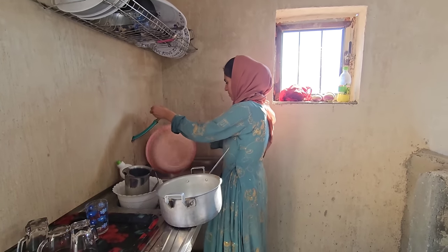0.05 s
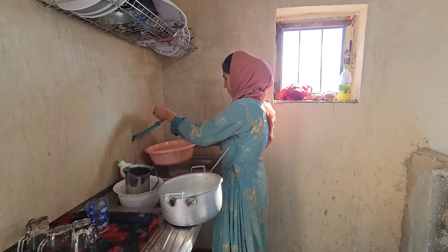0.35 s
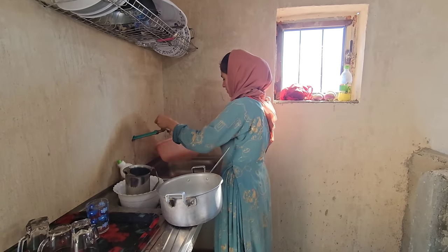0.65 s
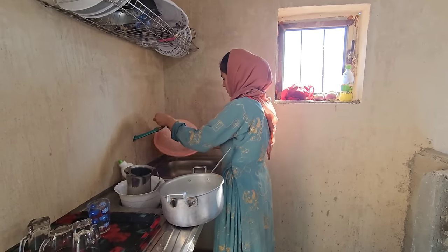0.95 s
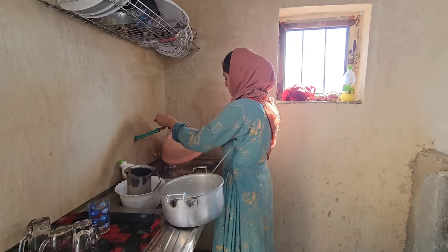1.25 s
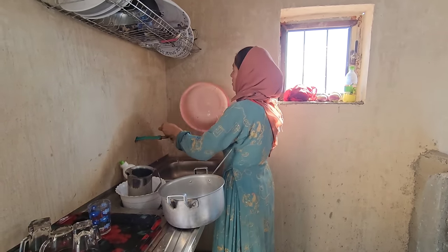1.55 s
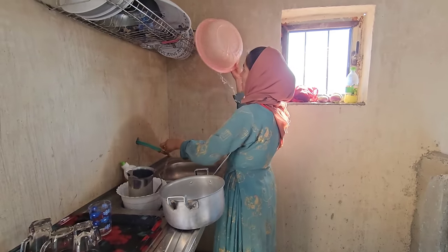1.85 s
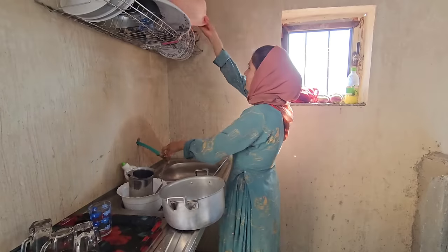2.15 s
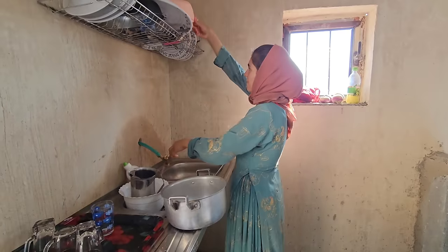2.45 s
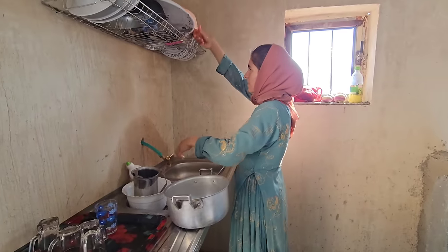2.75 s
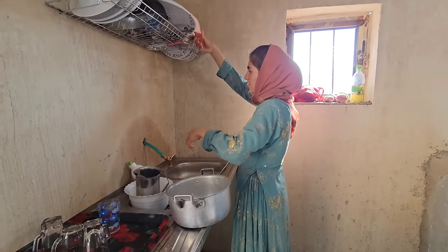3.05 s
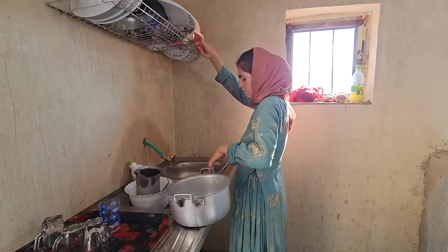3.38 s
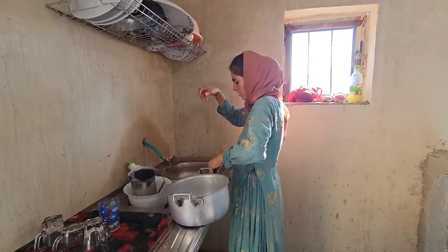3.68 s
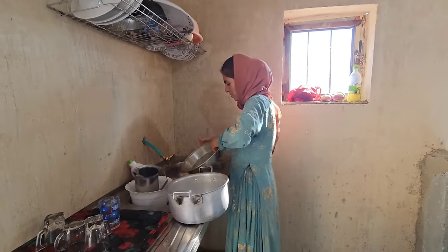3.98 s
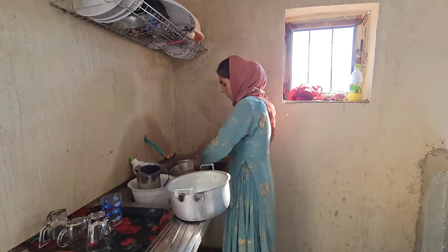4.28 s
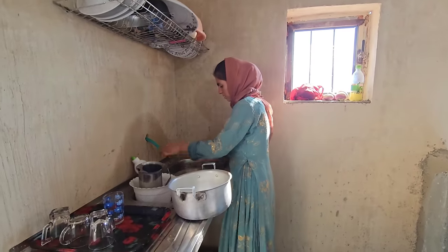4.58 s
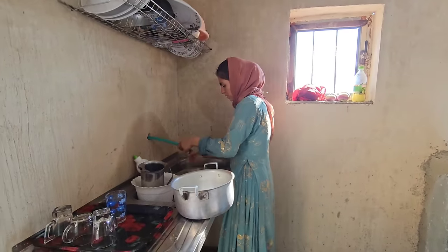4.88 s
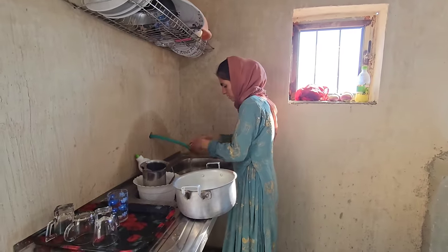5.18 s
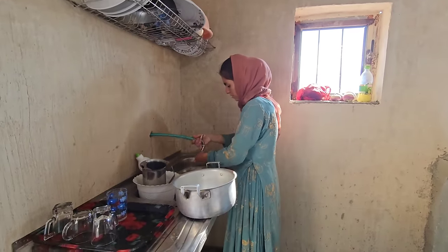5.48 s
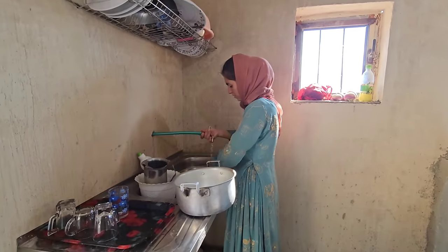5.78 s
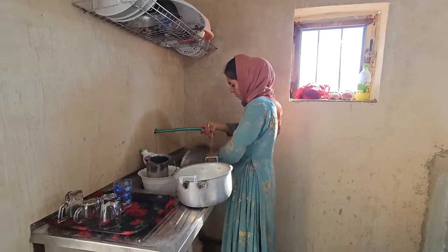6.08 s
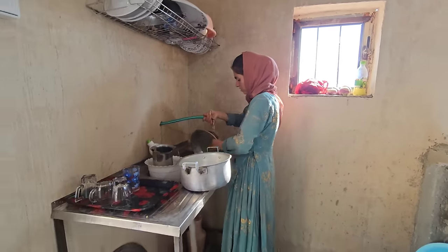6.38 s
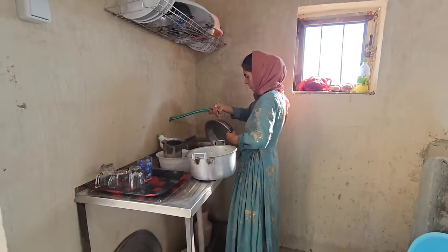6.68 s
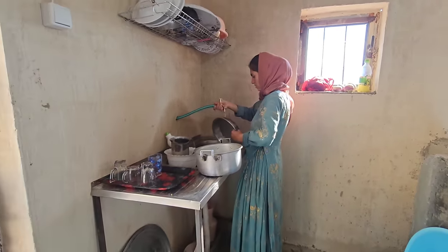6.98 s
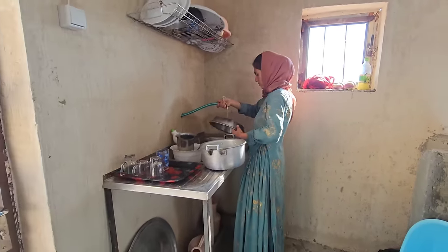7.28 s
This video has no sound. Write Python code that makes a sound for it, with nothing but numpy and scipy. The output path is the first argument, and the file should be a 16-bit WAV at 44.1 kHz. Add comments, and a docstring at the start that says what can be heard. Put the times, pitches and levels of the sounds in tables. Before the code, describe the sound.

Dishes being rinsed in a small room: trickling, splashing water, a bowl knocking on a metal sink and a lid clanging down.

```python
"""Water from a thin hose splashes over a plastic bowl and drums on a steel sink in a small, bare kitchen.
The bowl knocks on the sink and is pushed into a wire rack; a metal lid is lifted, dropped and rinsed.
Each knock makes a thing clatter and ring; the water is made of drops, bubbles and noise.
A finger covers the left microphone, so that side has only muffled thuds and the rumble of the hand."""
import sys
import numpy as np
from scipy import signal
from scipy.fft import rfft, irfft
from scipy.io import wavfile
from scipy.ndimage import uniform_filter1d, minimum_filter1d

SR = 44100
rng = np.random.default_rng(int(sys.argv[2]) if len(sys.argv) > 2 else 0)


def generate_wav(signal):
    """Clip the signal to [-1, 1] and save it as 16-bit WAV at the path in sys.argv[1]."""
    frames = np.transpose(np.atleast_2d(signal))
    scaled = np.clip(frames, -1, 1) * 32767
    pcm = np.round(scaled).astype(np.int16)
    wavfile.write(sys.argv[1], SR, pcm)


N = 332514
TIME = np.arange(N) / SR

# Levels are relative. A "fade" is the time a sound takes to drop by 60 dB.
# Knocks: t/s, level/dB, extra bass/dB, extra treble/dB, ring over clatter/dB, rattle time/s
SINK_KNOCKS = [(3.461, -40, -4, -10.5, -1, 0.03), (4.023, -16.5, 7, 1.5, 1, 0.0028),
               (4.286, -35, 3, 8.5, 2, .012), (4.308, -16, -4, -1.5, 1.5, 0.0024),
               (5.848, -41.5, 31, 19, -37, 0.011), (5.943, -36.5, 22.5, 5.5, 0.5, 0.012),
               (5.995, -38, 15, 1, -14, 0.0096), (6.123, -26.5, 19, 4.5, -1.5, 0.0022)]  # on the steel sink
RIM_KNOCKS = [(4.025, -19, -3, -33, 10, 0.0035), (6.501, -27, -3, 10, -16, 0.00042),
              (6.507, -25.5, 0, -9, 3, 0.005), (6.710, -31.5, -0.5, 1, -10, 0.0018)]  # the lid's rim on the sink
BOWL_KNOCKS = [(.976, -37, -11, 3, -12, 0.016), (1.052, -18.5, 8, 11.5, 1, 0.0029),
               (1.087, -19, 1.5, -4.5, 3.5, 0.0057), (1.124, -28, 5, 9, 4, 0.0087)]  # the bowl on the sink
RACK_KNOCKS = [(2.189, -33, 8, 5.5, -32, 0.02), (2.210, -36.5, 15, 0, -24, 0.0053),
               (2.224, -30, 12, 2, -4.5, 0.0073), (2.250, -34, 8.5, 1, -16, 0.0083),
               (2.272, -36, 3, 9, -29, 0.0026), (2.298, -35, -11, 4.5, -26, 0.0065),
               (2.326, -42, -6, 11, -17, 0.0022), (2.47, -45, 3, -15, -7, 0.088),
               (2.563, -36, 3.5, -4, -26, 0.018), (2.670, -43.5, -2, -7, -13, 0.019),
               (2.720, -36, 7, 10, 2, 0.0019), (2.756, -30.5, -2, 5, 3.5, 0.0012),
               (2.940, -49, 15, 11, -2.5, 0.0043), (3.066, -40.5, 1.5, -6, -6.5, 0.0051)]  # the bowl settling in the rack
LID_KNOCKS = [(3.596, -26, 2.5, 8.5, -3, 0.0013), (3.828, -47.5, -4, -20, -28, 0.005),
              (4.026, -24.5, 15, -19, 3, 0.0036)]  # the lid lifted and dropped
# The tone of each thing's short clatter: f/Hz, level/dB
SINK_CLATTER = [(50, -27.5), (82, -7), (100, -21.5), (132, 0), (175, -10.5), (245, -4), (320, -14.5),
                (470, -9.5), (580, -23), (1150, -20), (1800, -24.5), (2900, -27), (4200, -33.5),
                (7000, -38.5), (8600, -46.5), (11600, -39), (16000, -57)]
RIM_CLATTER = [(50, -52), (90, -4.5), (135, 0), (178, -22.5), (245, 0), (330, -11.5), (400, -10),
               (540, -17), (800, -7), (950, -19.5), (1400, -17.5), (2200, -26), (4000, -37.5), (6800, -40),
               (8600, -54), (11600, -46), (16000, -72)]
BOWL_CLATTER = [(45, -29), (75, -3), (98, -9), (128, 2.5), (190, -10), (245, -5.5), (300, -6.5), (372, -7),
                (470, -8.5), (1200, -15), (2100, -17), (2700, -22.5), (4400, -26.5), (7200, -34),
                (8600, -40.5), (11600, -37), (16000, -54)]
RACK_CLATTER = [(60, -29), (135, -6.5), (240, -22.5), (302, -4), (406, -19), (480, -6), (850, -8.5),
                (1100, -9), (1500, -8), (2200, -13.5), (4200, -15), (5200, -20), (7300, -21.5),
                (8500, -27.5), (11800, -18.5), (14000, -27.5), (16000, -34)]
LID_CLATTER = [(59, -29), (100, -6), (283, -12), (481, -0.5), (570, -12), (818, -7.5), (872, -12),
               (1550, -14.5), (2080, -22), (2520, -17), (2930, -20.5), (6990, -31), (16000, -49)]
# The notes that ring on after a knock: f/Hz, level/dB, fade/s
SINK_NOTES = [(121.1, 4, 0.46), (140, -3, 0.29), (178.2, -15, 0.81), (241.8, 6, 0.71), (275, 3.5, 0.43),
              (332, 1.5, 0.54), (347, -11, 0.15), (417, -2.5, 0.65), (498, -14, 0.19), (561, -10, 0.64),
              (807, -5, 0.43), (927, -20, 0.95), (1138, -2.5, 0.14), (1130, -16, 0.89), (1205, -12.5, 0.58),
              (1297, -8.5, 0.2), (1592, -11.5, 0.69), (2074, -16, 0.64), (2530, -11, 0.27),
              (2850, -33, 0.23)]
RIM_NOTES = [(126, -24, 0.25), (261, 5.5, 0.27), (371.5, -2.5, 0.67), (381.3, 3.5, 0.21), (626, -32, 0.22),
             (653, -16, 0.98), (803, 1.5, 0.31), (843, -5, 0.43), (1102, -8.5, 0.44), (1424, -1.5, 0.21),
             (1583, -14, 0.18), (1926, 1, 0.13), (3290, -9, 0.2)]
BOWL_NOTES = [(82.8, -7.5, 0.95), (124.8, 6.5, 0.24), (144, -13, 1), (247.2, 0.5, 0.43), (359, -10, 0.35),
              (382, -3, 0.48), (674, -7.5, 0.28), (1231, -5.5, 0.28), (1430, -10, 0.3), (1520, -7.5, 0.18),
              (2120, -19, .3)]
RACK_NOTES = [(523, 1, 0.38), (619.6, 9.5, 0.32), (834, 12, 0.27), (1023, 4, 0.36), (1240, 2, 0.48),
              (1560, 0, 0.6), (1694, -5, 0.19), (1640, 4.5, 0.21), (2058, 6.5, 0.47), (3380, -26, 0.25),
              (4300, -22, 0.24)]
LID_NOTES = [(486, 0, 0.6), (817, -2, 0.53), (1510, -7, 0.29), (2490, -4.5, 0.36), (2670, -1, 0.072),
             (3280, -18, 0.27), (3730, -11.5, 0.38), (4183, -10, 0.19), (4680, 0.5, 0.049),
             (5870, -13, 0.24), (6470, -12, 0.19), (7150, -1.5, 0.06), (10600, -13, 0.13),
             (11700, -12, 0.17)]
# Rack wires plucked by the bowl: t/s, level/dB, f/Hz, fade/s
WIRE_PINGS = [(2.318, -39, 5100, 0.15), (2.326, -31, 4115, 0.1), (2.719, -27.5, 836, 0.13),
              (2.727, -43, 4420, 0.25), (2.758, -25.5, 1697, 0.074), (2.759, -23, 1137, 0.058)]

# The tone of splashing water: f/Hz, level/dB
WATER_TONE = [(150, -10), (250, 2.5), (400, 2), (650, 2.5), (900, -4), (1400, 4.5), (2200, 4), (3500, -2),
              (5500, -10), (7400, -10), (8600, -18), (11700, -10), (14000, -19), (16000, -19)]
# The notes of the sink floor under the stream: f/Hz, half width/Hz, level/dB
FLOOR_NOTES = [(89, 4.4, -11.5), (137, 7.8, -2.5), (243.6, 11.8, -2), (274, 23, -14), (377, 23, -20)]
# Water falling straight on the sink floor: t/s, length/s, level/dB
FLOOR_POURS = [(-0.06, 0.097, -40), (0.103, 0.54, -51), (0.871, 0.16, -43.5), (1.35, 0.077, -44.5),
               (1.592, 0.063, -36), (1.72, 0.069, -46), (5.338, 0.11, -51.5), (7.11, 0.35, -54.5)]
# Water breaking up on the bowl, a hand or the lid: t/s, length/s, level/dB, extra spray/dB
SPLASHES = [(-0.06, 0.073, -49, -8), (0.137, 0.27, -53, -4), (0.295, 0.34, -54.5, 6.5),
            (0.891, 0.11, -51, 4.5), (1.55, 0.15, -49, 2.5), (1.743, 0.043, -47, -2),
            (4.62, 0.11, -52, -12), (4.95, 0.5, -58, -2.5), (5.913, 0.49, -59.5, 2),
            (7.11, 0.96, -53, -1.5), (7.284, 0.093, -47, -23)]
# Single gurgles, and a faint ring of the lid at 5 s:
# t/s, level/dB, middle f/Hz, pitch spread/octaves, half length/s
GURGLES_AND_RING = [(0.184, -51.5, 1940, 0.88, 0.05), (0.325, -51, 646, 0.01, 0.013),
                    (0.874, -56.5, 1720, 1.03, 0.003), (1.418, -52.5, 4350, 0.64, 0.0045),
                    (2.03, -61, 9500, 0.39, 0.0078), (3.895, -56.5, 6760, 0.11, 0.0079),
                    (4.698, -59, 6000, 0.67, 0.011), (4.876, -64, 1470, 1.2, 0.0088),
                    (5.016, -56, 827, 0.06, 0.073), (5.14, -64.5, 7700, 0.19, 0.0081),
                    (5.218, -52, 3230, 0.24, 0.021), (5.33, -65, 3460, 0.5, 0.008),
                    (5.363, -58.5, 1720, 0.9, 0.0052), (5.421, -57.5, 5850, 1.15, .01),
                    (5.6, -54, 1040, 0.69, 0.0019), (5.679, -60.5, 4900, 0.47, 0.012),
                    (5.804, -53.5, 3100, 0.146, 0.005), (5.839, -64, 2350, 0.17, 0.018),
                    (5.94, -54, 1610, 0.33, 0.1), (7.115, -52, 1850, 1.1, .005),
                    (7.304, -49.5, 1710, 0.62, 0.056)]

# The tone of the hand's rumble: f/Hz, level/dB
RUMBLE_TONE = [(8, -30.5), (20, 4), (35, 1), (60, 2), (100, -13.5), (150, -17), (250, -49), (500, -57),
               (1000, -62.5), (3000, -68.5), (10000, -82)]
# The finger shifting on the microphone: t/s, peak/dB, time from middle to peak/s
FINGER_BUMPS = [(0.1, -29.5, 0.007), (0.4154, -18.5, 0.0022), (0.953, -24.5, .005), (2.478, -27, 0.0053),
                (2.67, -24.5, 0.0021), (2.716, -23, 0.0037), (2.901, -27.5, 0.0035), (3.135, -22.5, 0.0032),
                (4.857, -24, 0.002), (4.878, -23, 0.0029), (5.53, -24.5, 0.0031), (6.251, -27, 0.0042),
                (6.406, -29.5, 0.0013), (6.442, -21.5, 0.0025)]
# What gets through the finger: f/Hz, gain/dB
THROUGH_FINGER = [(30, -24), (70, -2), (125, -19.5), (240, -21.5), (480, -26.5), (820, -33.5), (1500, -41),
                  (3000, -47), (6000, -52), (12000, -99)]
# The tone of the room's background hiss: f/Hz, level/dB
HISS_TONE = [(30, -16.5), (85, 5.5), (130, -5.5), (180, -7), (245, -8), (330, -15), (700, -16.5),
             (1500, -14), (3000, -19), (7400, -26.5), (8600, -31.5), (11700, -26), (16000, -43)]
# How long the room echoes: f/Hz, fade/s
ROOM_FADE = [(60, 0.12), (250, 0.9), (500, 0.53), (1500, 0.65), (3000, 0.48), (6000, 0.43), (12000, 0.34),
             (16000, 0.36)]


def dishes():
    """The sink, lid, bowl and rack each answer a knock with their own clatter and notes."""
    return (knocks(SINK_KNOCKS, SINK_CLATTER, SINK_NOTES, bass_hz=246, treble_hz=1170, early_db=6.5)
            + knocks(RIM_KNOCKS, RIM_CLATTER, RIM_NOTES, bass_hz=260, treble_hz=2230, early_db=4.5)
            + knocks(BOWL_KNOCKS, BOWL_CLATTER, BOWL_NOTES, bass_hz=217, treble_hz=2420, early_db=5.5)
            + knocks(RACK_KNOCKS, RACK_CLATTER, RACK_NOTES, bass_hz=395, treble_hz=4340, early_db=4)
            + knocks(LID_KNOCKS, LID_CLATTER, LID_NOTES, bass_hz=300, treble_hz=3880, early_db=1.5))


def knocks(rows, tone, notes, bass_hz, treble_hz, early_db):
    """A hit and a brief rattle shake a thing: it clatters into the room and a few notes ring on."""
    out, t = np.zeros(N), np.arange(SR) / SR
    onset = slice(SR // 10)
    grid_hz = np.linspace(0, SR / 2, 500)
    overtones_db = rng.uniform(-4.5, 4.5, len(grid_hz))
    swell = 1 - .75 * np.exp(-t / .002)  # the sound builds up over the first echoes
    for start, db, bass_db, treble_db, ring_db, rattle_s in rows:
        tilt_db = lambda hz: bass_db * below(hz, bass_hz) + treble_db * (1 - below(hz, treble_hz))
        # each spot that is hit brings out other overtones
        spot_db = (overtones_db + rng.uniform(-4.5, 4.5, len(grid_hz))) * (1 - below(grid_hz, 1500))
        contacts = rng.standard_normal(SR) * (rng.random(SR) < 900 / SR) * np.exp(-t / rattle_s)
        contacts[0] += 1.3  # the first hit
        echo = room(direct=0) * gain_of(early_db * np.exp(-t / 0.023))  # near walls answer loudest
        burst = flattened(signal.fftconvolve(contacts, echo)[:SR])
        burst *= np.clip(3 * (1 - t), 0, 1) ** 2
        clatter = filtered(burst, lambda hz: read(tone, hz) + tilt_db(hz) + np.interp(hz, grid_hz, spot_db))
        ring = sum(gain_of(note_db + tilt_db(hz) - 60 * t / fade_s) * sine(hz, t)
                   for hz, note_db, fade_s in notes)
        ring_gain = gain_of(ring_db)
        knock = clatter / clatter[onset].std() + ring_gain * ring / ring[onset].std()
        add(out, start, gain_of(db) * swell * knock / np.hypot(1, ring_gain))
    return out


def wires():
    """A rack wire slips off the bowl's rim and pings at its own pitch."""
    out, t = np.zeros(N), np.arange(SR // 2) / SR
    for start, db, hz, fade_s in WIRE_PINGS:
        add(out, start, gain_of(db - 60 * t / fade_s) * np.sin(2 * np.pi * hz * t))
    return out + 0.5 * signal.oaconvolve(out, room(direct=0))[:N]


def stream(spray_hz=2800):
    """The stream breaks into drops and bubbles (low splatter, high spray) and drums on the sink floor."""
    drum, splatter, spray = flow()
    fizz = sum(signal.oaconvolve(drops(per_s=55, spread_db=4), bubble(hz, rng.uniform(1.5, 7)))[:N]
               for hz in np.geomspace(500, 14000, 36))
    patter = unit_level(flattened(fizz, size=2500))
    patter += gain_of(-0.5) * unit_level(drops(per_s=700, spread_db=6.4))
    water = unit_level(signal.oaconvolve(patter, room(direct=1))[:N])
    water += gain_of(-3) * rng.standard_normal(N)  # smooth hiss
    low = filtered(water, lambda hz: read(WATER_TONE, hz) + 20 * np.log10(below(hz, spray_hz) + 1e-6))
    high = filtered(water, lambda hz: read(WATER_TONE, hz) + 20 * np.log10(1 - below(hz, spray_hz) + 1e-6))
    floor_power = lambda hz: sum((gain_of(db) * below(hz - f, width)) ** 2 for f, width, db in FLOOR_NOTES)
    floor = noise(lambda hz: 10 * np.log10(floor_power(hz) + 1e-9), size=16384)
    return splatter * unit_level(low) + spray * unit_level(high) + gain_of(-1) * drum * floor


def flow(sputter_db=2.9):
    """How strong drumming, splatter and spray are: gushes join a trickle, and the hose sputters."""
    drum, splatter, spray = gain_of([-60, -61, -62])  # the trickle that never stops
    for start, length, db in FLOOR_POURS:
        drum = np.hypot(drum, gain_of(db) * gush(start, length))
    for start, length, db, spray_db in SPLASHES:
        splash = gain_of(db) * gush(start, length)
        splatter = np.hypot(splatter, splash)
        spray = np.hypot(spray, gain_of(spray_db) * splash)
    sputter = gain_of(sputter_db * wander(top_hz=11))
    return drum * sputter, splatter * sputter, spray * sputter


def gush(start, length, rise_s=0.042, run_off_db_per_s=91):
    """One gush swells quickly, holds, and dies away as the water runs off."""
    age = TIME - start
    return np.clip(age / rise_s, 0, 1) * gain_of(-run_off_db_per_s * np.maximum(age - length, 0))


def drops(per_s, spread_db):
    """Drops land at random times, most of them small, a few large."""
    lands = rng.random(N) < per_s / SR
    sizes = gain_of(spread_db * np.minimum(rng.exponential(1, N), 4))
    return lands * sizes * rng.choice([-1, 1], N)


def bubble(hz, cycles, rise=0.054):
    """A trapped bubble rings briefly, rising in pitch as it nears the surface."""
    turns = np.arange(int(5 * cycles * SR / hz) + 2) * hz / SR
    phase = 2 * np.pi * turns * (1 + rise * turns / cycles / 5)
    return np.exp(-turns / cycles) * np.sin(phase) * np.sqrt(hz / cycles)


def gurgles_and_ring(count=40, sag_octaves=0.19):
    """Bunches of short pings, sinking in pitch, make the gurgles and one faint ring of the lid."""
    out = np.zeros(N)
    for start, db, middle_hz, octaves, half_s in GURGLES_AND_RING:
        bunch = np.zeros(SR // 4)
        for late, scatter in zip(np.linspace(0, 1, count) ** 2, rng.standard_normal(count)):
            hz = np.clip(middle_hz * 2 ** (octaves * scatter + sag_octaves * (.5 - late)), 300, 15000)
            add(bunch, late * 2 * half_s, rng.choice([-1, 1]) * bubble(hz, cycles=5))
        echoed = signal.fftconvolve(bunch, room(direct=0.97))
        add(out, start, gain_of(db) * echoed / echoed[:SR // 10].std())
    return out


def finger(walk_start_s=5.21, walk_db=3, tremble_db=2.5):
    """The finger rumbles as its pressure wanders, more so when walking, and bumps when it shifts."""
    rumble = noise(lambda hz: read(RUMBLE_TONE, hz), size=16384)
    walking = np.clip((TIME - walk_start_s) / 0.082, 0, 1)
    out = rumble * gain_of(-38.5 + walk_db * walking + tremble_db * wander(top_hz=4.6))
    for middle, db, width_s in FINGER_BUMPS:
        offset = (TIME - middle) / width_s
        out += gain_of(db) * offset * np.exp((1 - offset ** 2) / 2)  # one pull, one push
    return out


def room_hiss():
    """The room's soft, steady background hiss."""
    return gain_of(-56) * noise(lambda hz: read(HISS_TONE, hz))


def room(direct):
    """A click in the room: the direct sound, then echoes off bare plaster that crowd together."""
    density = np.minimum(.05 + 6 * np.arange(SR) / SR, 1)
    echoes = rng.standard_normal(SR) * (rng.random(SR) < density) / np.sqrt(density)
    hz, t, bands = signal.stft(echoes, SR, nperseg=256)
    fade = gain_of(-60 * t / read(ROOM_FADE, hz)[:, None])
    tail = signal.istft(bands * fade, SR, nperseg=256)[1][:SR]
    tail /= np.linalg.norm(tail)
    tail[0] += direct
    return tail


def wander(top_hz):
    """A slow, random drift made of waves no faster than top_hz."""
    t = TIME[::100]
    drift = sum(sine(hz, t) for hz in top_hz * np.geomspace(.1, 1, 24))
    return unit_level(np.interp(TIME, t, drift))


def sine(hz, t):
    """A pure wave that starts at a random point in its cycle."""
    return np.sin(2 * np.pi * (hz * t + rng.random()))


def noise(db_at, size=4096):
    """Steady noise with the tone db_at(hz)."""
    return unit_level(filtered(rng.standard_normal(N), db_at, size))


def filtered(x, db_at, size=4096):
    """Turns each frequency up or down by db_at(hz), with no sound ahead of a hit."""
    hz = abs(np.fft.fftfreq(size, 1 / SR))
    log_gain = np.log(gain_of(np.maximum(db_at(hz), -110)))
    taps = np.fft.ifft(np.exp(np.conj(signal.hilbert(log_gain)))).real
    return signal.oaconvolve(x, taps[:size // 2])[:len(x)]


def flattened(x, size=60):
    """Makes low and high bands equally strong, keeping their fine ripple."""
    spectrum = rfft(x)
    return irfft(spectrum / np.sqrt(uniform_filter1d(abs(spectrum) ** 2, size) + 1e-12), len(x))


def below(hz, corner_hz):
    """Slides from 1 for low frequencies to 0 for high ones."""
    return 1 / (1 + (hz / corner_hz) ** 2)


def read(table, hz):
    """Reads between a table's rows on a log-frequency scale."""
    f, value = np.transpose(table)
    return np.interp(np.log(hz + 1), np.log(f + 1), value)


def gain_of(db):
    """Turns decibels into a multiplier."""
    return 10 ** (np.asarray(db) / 20)


def unit_level(x):
    """Scales a sound to an average (rms) level of 1."""
    return x / np.sqrt(np.mean(x ** 2) + 1e-20)


def add(mix, start_s, sound):
    """Mixes a sound in at start_s."""
    part = mix[max(round(start_s * SR), 0):][:len(sound)]
    part += sound[:len(part)]


def scene():
    """The right side hears the kitchen openly; the left hears it through the finger."""
    kitchen = dishes() + wires() + stream() + gain_of(-0.5) * gurgles_and_ring() + room_hiss()
    kitchen *= gain_of(5.5)
    muffled = filtered(kitchen, lambda hz: read(THROUGH_FINGER, hz))
    return np.array([muffled + finger(), kitchen])


def record(dry, top_hz=15950):
    """Briefly turns down any peak above full scale, then cuts the highest treble."""
    allowed = np.minimum(1, 1 / (abs(dry).max(0) + 1e-9))
    limited = dry * uniform_filter1d(minimum_filter1d(allowed, 200), 200)
    low_pass = signal.firwin(511, top_hz, window=("kaiser", 9), fs=SR)
    return signal.oaconvolve(limited, low_pass[None], "same")


dry = scene()
out = record(dry)
generate_wav(out)
```